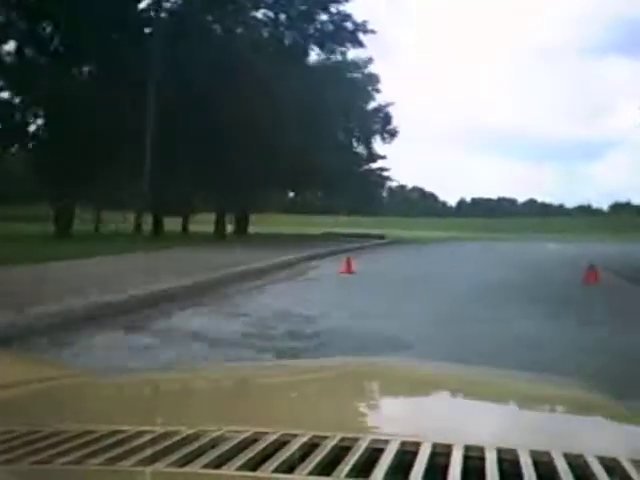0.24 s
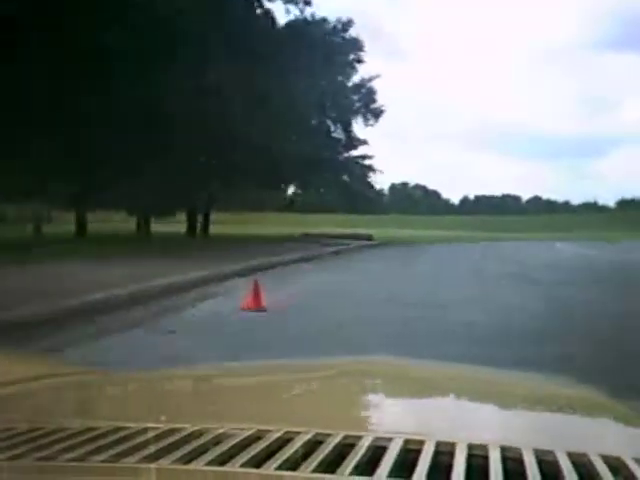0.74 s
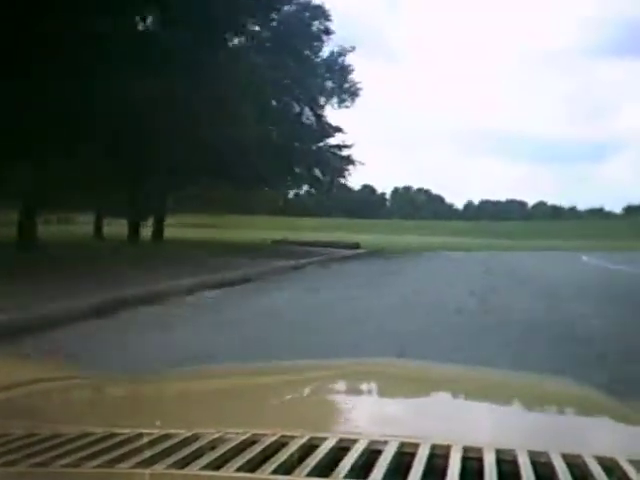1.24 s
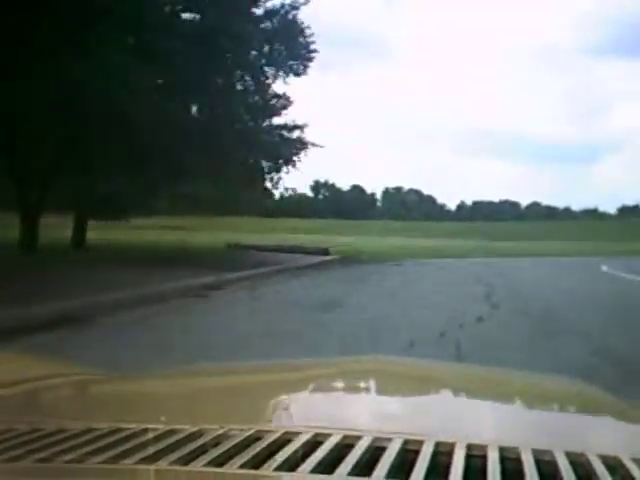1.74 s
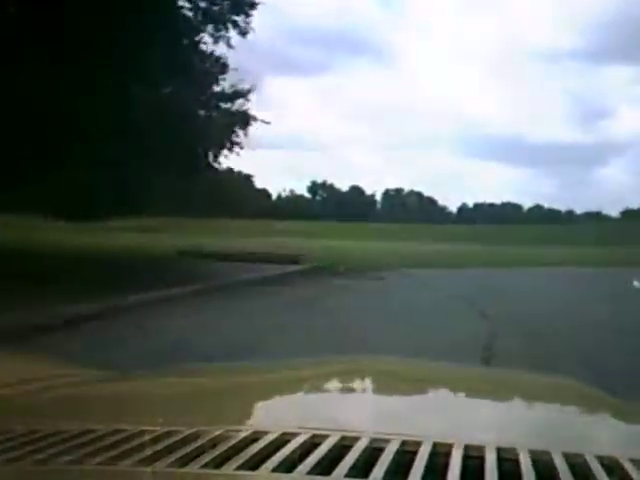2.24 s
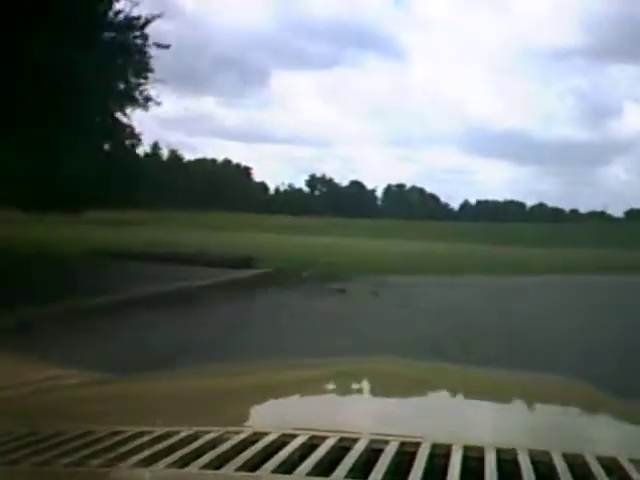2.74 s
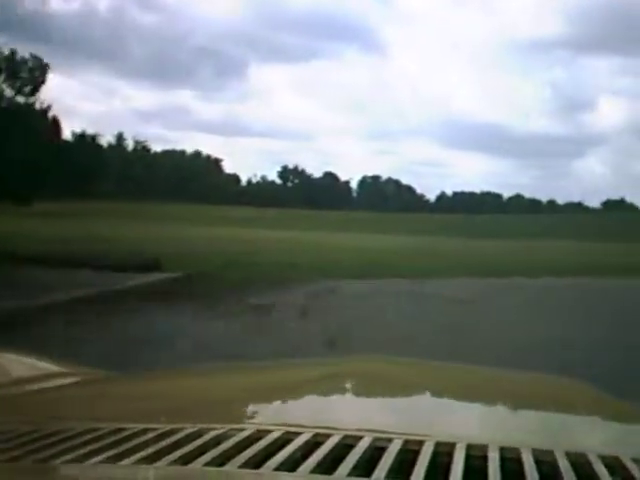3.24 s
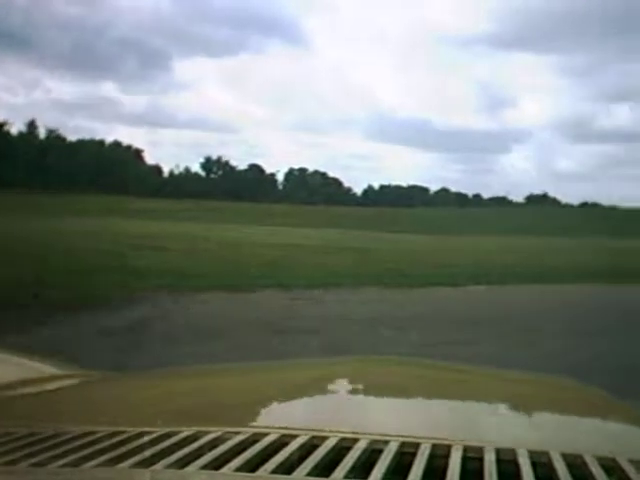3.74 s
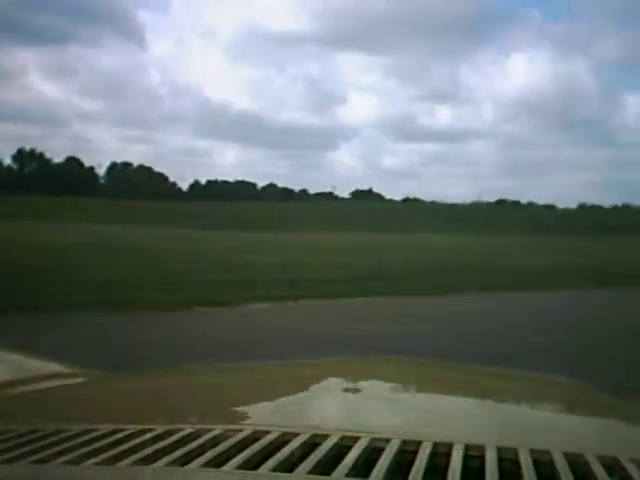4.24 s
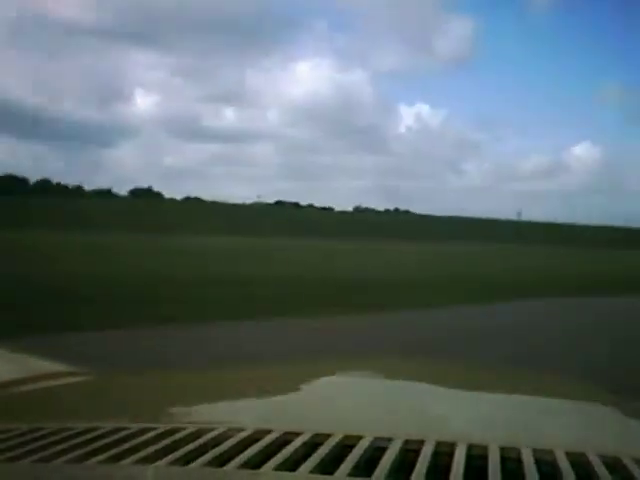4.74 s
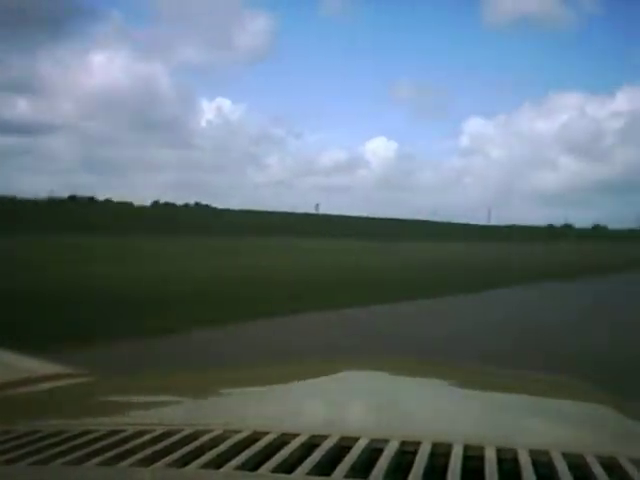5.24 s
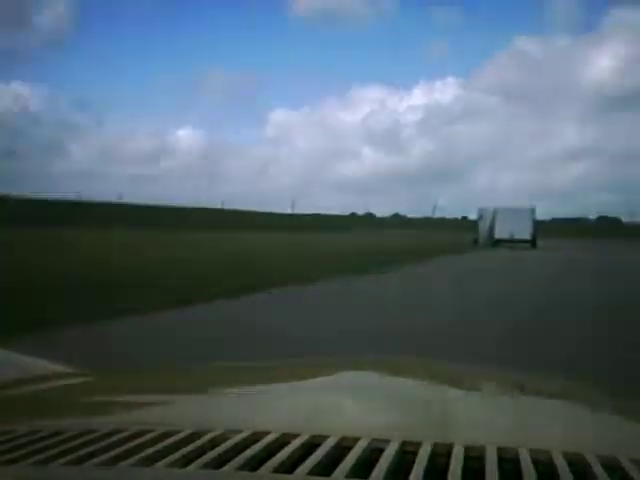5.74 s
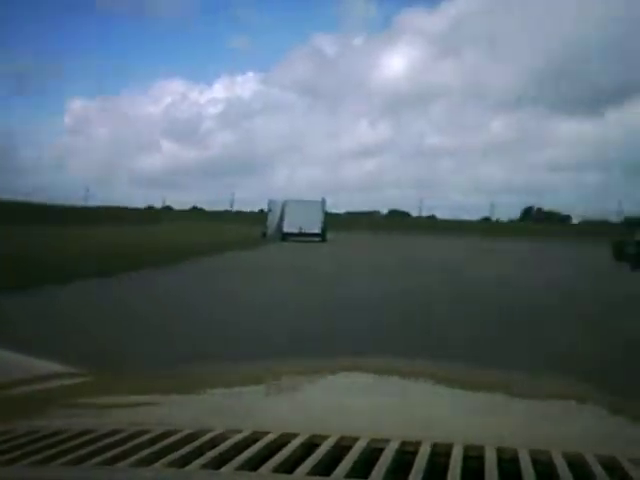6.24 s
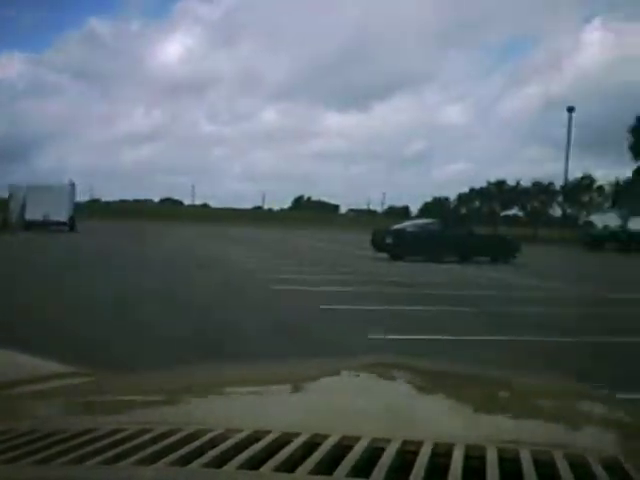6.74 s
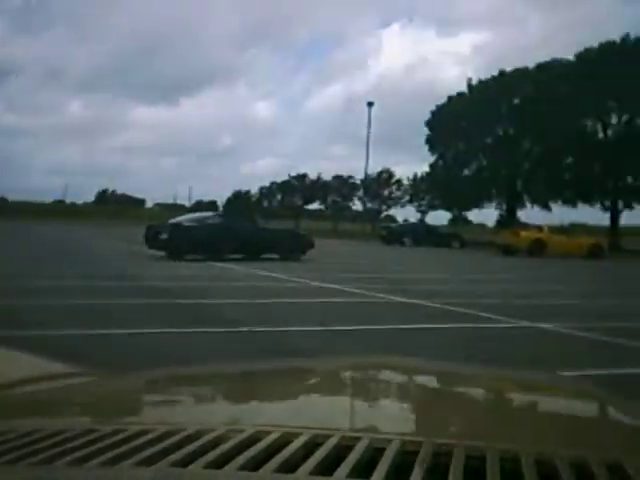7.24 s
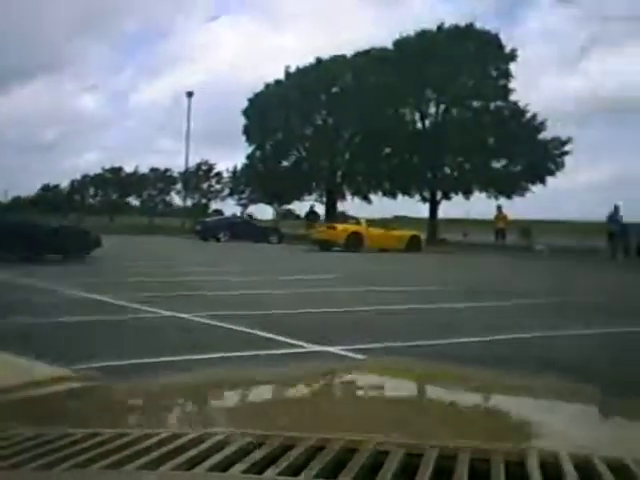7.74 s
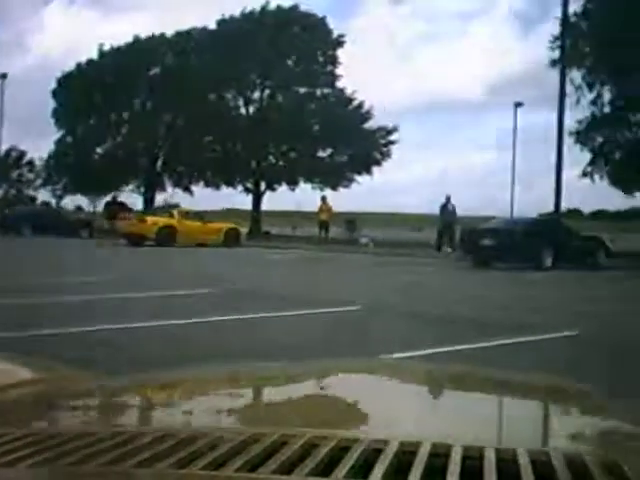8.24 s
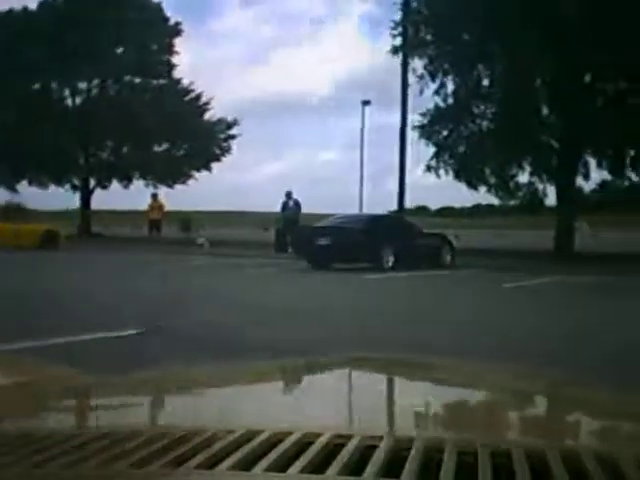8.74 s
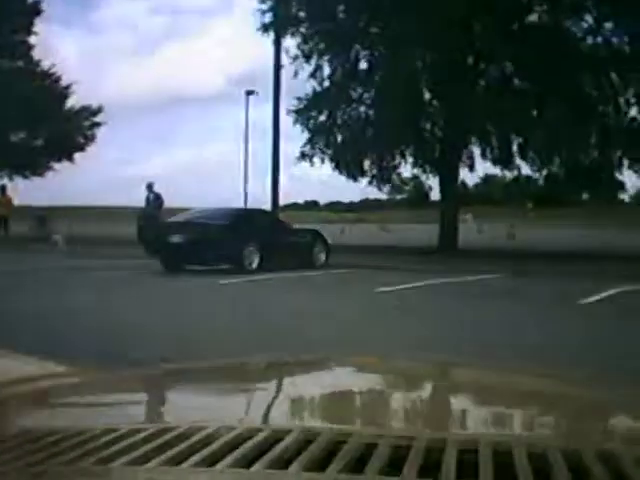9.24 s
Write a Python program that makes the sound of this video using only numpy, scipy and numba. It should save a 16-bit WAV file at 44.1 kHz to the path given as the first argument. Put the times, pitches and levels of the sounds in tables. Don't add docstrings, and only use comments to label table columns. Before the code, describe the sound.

A dashboard camera hears boxy road rumble and hissing tyres as the car slows. A wavering gear whine sinks and disappears, brakes scuff softly, and loose mounting parts rattle over bumps. After a calmer, fading coast, sudden clipped thumps, scraping fingers and dry ticks burst very close to the microphone, with abrupt muted gaps between them until the end.

```python
import sys
import numpy as np
from scipy import signal
from scipy.io import wavfile
from scipy.ndimage import uniform_filter1d
from numba import njit

SR = 44100
rng = np.random.default_rng(int(sys.argv[2]) if len(sys.argv) > 2 else 0)


def volts_from_db(level):
    exponent = np.asarray(level, float) / 20
    return 10 ** exponent


def dump_mix(stems):
    frames = np.atleast_2d(stems).T
    limited = np.clip(frames, -1, 1)
    pcm = np.round(limited * 32767).astype(np.int16)
    wavfile.write(sys.argv[1], SR, pcm)


N = 418499
T = np.arange(N) / SR
RAIL = 0.695

# pitch [Hz], width [Hz], level [dB].
SHELL_HIGH = [(2337, 344, -3.5), (2807, 99, -8.5), (3216, 490, 1), (4040, 710, 1)]


@njit
def svf(x, hz, width):
    y, band, low = np.empty(len(x)), 0., 0.
    g, k = np.tan(np.pi * hz / SR), width / hz
    for i in range(len(x)):
        v = (band + g * (x[i] + 1e-18 - low)) / (1 + g * (g + k))
        band = 2 * v - band
        low = low + 2 * g * v
        y[i] = k * v
    return y


def coupling(x):
    leak_s = 0.00195
    keep = np.exp(-1 / (leak_s * SR))
    return signal.lfilter([1, -1], [1, -keep], x)


def walk(rate):
    k = int(SR / rate)
    steps = np.repeat(rng.standard_normal(N // k + 1), k)
    return 1.4 * uniform_filter1d(uniform_filter1d(steps, k), k)[:N]


def modes(force, table):
    out = np.zeros(N)
    for k, (hz, width, db) in enumerate(table):
        out += (-1) ** k * volts_from_db(db) * svf(force, 1. * hz, 1. * width)
    return out


def murmur(table, flicker_db, rate):
    out = np.zeros(N)
    for hz, width, db in table:
        band = rng.standard_normal(N)
        for _ in range(2):
            band = svf(band, 1. * hz, 1.39 * width)
        out += volts_from_db(db + flicker_db * walk(rate)) * band
    return out / np.std(coupling(out))


def road():
    # time [s], drive [dB].
    drive_points = [(0, 4), (.15, 1.5), (.57, 0), (.82, 0), (.95, 1.5), (1.11, 2), (1.28, -1.5), (1.7, -2),
                    (2.1, -2), (2.78, -3.5), (3.38, -1.5), (3.95, -3.5), (4.55, -4.5), (5.24, -7),
                    (6.0, -7), (6.5, -8), (7.05, -6.5), (9.49, -11)]
    # pitch [Hz], width [Hz], level [dB].
    cabin_modes = [(32.3, 8.6, 4), (57.2, 14, 1), (87.55, 12.6, 3), (138.5, 37.7, -8), (186.5, 32.7, -10),
                   (263, 26, -20.5)]
    # pitch [Hz], width [Hz], level [dB].
    shell_low = [(538.4, 130, -6.5), (786.4, 127, -0.5), (1070, 230, -6), (1281, 101, -5), (1600, 340, -17)]
    drive_db = np.interp(T, *np.transpose(drive_points))
    grain_db = 0.69 * walk(30) + 0.81 * walk(120)
    rumble_db = -19 + 0.59 * drive_db
    roar_db = -34 + drive_db + grain_db
    hiss_db = -35 + 0.86 * drive_db + grain_db
    rumble = volts_from_db(rumble_db) * murmur(cabin_modes, flicker_db=1.5, rate=9.8)
    roar = volts_from_db(roar_db) * murmur(shell_low, flicker_db=-2.17, rate=20)
    hiss = volts_from_db(hiss_db) * murmur(SHELL_HIGH, flicker_db=1.42, rate=25)
    return rumble + roar + hiss


def gears():
    # time [s], pitch [Hz], level [dB].
    whine_points = [(0, 3360, -46), (.5, 3320, -44), (.85, 3180, -42), (1.15, 2990, -47), (1.4, 2850, -45),
                    (1.65, 2710, -58), (2.4, 2360, -57), (2.62, 2180, -49), (2.95, 1950, -75)]
    s, hz, db = np.transpose(whine_points)
    pitch = np.interp(T, s, hz) * (1 + 0.003 * walk(60) + 0.004 * walk(12))
    swell_db = np.interp(T, s, db, right=-120) + 1 + 3.5 * walk(22)
    return np.sqrt(2) * volts_from_db(swell_db) * np.sin(2 * np.pi * np.cumsum(pitch) / SR)


def brakes():
    start_s, attack_s, hold_s, release_s = 1.614, 0.16, 0.35, 0.45
    level_db, range_db = -26.5, 33.5
    s = start_s + np.cumsum([0, attack_s, hold_s, release_s])
    grip_db = level_db - range_db * np.array([1, 0, 0, 1])
    grip_db = np.interp(T, s, grip_db, left=-120, right=-120)
    # pitch [Hz], width [Hz], level [dB]
    disc_modes = [(1730, 80, -16), (2570, 130, -9.0), (3052, 90, -4.5), (3246, 99, 0),
                  (3520, 57, -2), (3720, 260, -2.5), (3670, 180, -1), (4200, 190, 3.5)]
    return volts_from_db(grip_db) * murmur(disc_modes, flicker_db=-3.5, rate=18)


def thumps():
    # start [s], size [dB], settled pitch [Hz], time to fade by 60 dB [s].
    bumps = [(-.008, 1.5, 51.97, 0.63), (-.004, -2, 78.97, 0.74), (.064, 0.5, 100, 0.097),
             (0.808, -5, 95, .15), (.82, -15.5, 190, .08), (0.889, -5, 70, .15), (.93, -13.5, 140, 0.15),
             (1.015, -10, 110, 0.14), (1.185, -10, 120, 0.081), (1.097, -4.5, 85, 0.23),
             (1.099, -13, 170, .1), (2.342, -14.5, 620, .02), (2.354, -20, 357, 0.019),
             (4.0682, -2.5, 2220, 0.00083)]
    # start [s], size [dB], settled pitch [Hz], time to fade by 60 dB [s].
    hand_blows = [(7.101, 6, 86, .29), (7.108, -7.5, 620, 0.037), (7.412, -1.5, 50.8, .25),
                  (7.6, -4, 128, 0.042), (7.874, 2.5, 75, 0.062), (7.603, -8, 300, 0.0088),
                  (7.851, -11, 200, 0.024), (7.886, -0.5, 330, 0.016), (7.722, 0.5, 174, 0.01),
                  (8.039, 0, 209.7, 0.13), (8.043, -2.5, 504, 0.064), (8.047, 0.5, 110.6, 0.16),
                  (8.631, -1, 147, 0.015), (8.265, -7, 220, 0.006), (8.309, 5, 158, 0.0083),
                  (8.379, -11.5, 193, 0.058), (9.11, -11, 872, 0.066), (9.311, 3.5, 310, 0.0021)]
    stiffening, settle_s = 0.3, 0.017
    out, wobble = np.zeros(N), 0.32 * walk(70)
    for s, db, hz, t60 in list(bumps) + list(hand_blows):
        near = slice(max(int(s * SR), 0), int((s + t60) * SR))
        t = T[near] - s
        turns = hz * (t + stiffening * settle_s * (1 - np.exp(-t / settle_s)))
        swing = np.sin(2 * np.pi * turns + wobble[near] * turns)
        out[near] += volts_from_db(db - 60 * t / t60) * swing
    return out


def touch(events, slip_db, blow_db, t60):
    out = np.zeros((2, N))
    slip = rng.standard_normal(N) * volts_from_db(slip_db * walk(400))
    for s, db, treble_db, contact_s in events:
        i = int(s * SR)
        t = T[:min(int((contact_s + t60) * SR), N - i)]
        fade_db = 60 * np.maximum(t - contact_s, 0) / t60
        force = slip[i:i + len(t)] * volts_from_db(db - fade_db)
        force[:4] += volts_from_db(db + blow_db)
        out[:, i:i + len(t)] += force * volts_from_db(np.array([[0], [treble_db]]))
    return out


def rattles():
    # start [s], peak [dB], treble share [dB].
    rattle_events = [(.054, -14.5, -19), (.222, -22.5, -3), (.337, -32, -17), (.72, -33, 9.5),
                     (.79, -12.5, -5.5), (.984, -23, -1.5), (2.097, -32, 8), (2.335, -13, 1),
                     (2.718, -21.5, -32), (2.968, -26, -2.5), (3.222, -18, -19), (3.62, -33, -8.5),
                     (3.935, -19, -18), (4.482, -22, -21.5), (5.269, -27.5, -1.5), (6.153, -31, -36),
                     (6.606, -20, -11.5)]
    contact_s = 0.012
    events = [(*row, contact_s) for row in rattle_events]
    return touch(events, slip_db=1.0, blow_db=8.0, t60=0.04)


def rubs():
    # start [s], peak [dB], treble share [dB], contact [s].
    rub_events = [(.0145, -3, -32, 0.0059), (7.104, -7.5, -8, 0.011), (7.14, -16, 0.5, 0.017),
                  (7.314, -5.5, -5.5, .016), (7.345, 8, -16.5, 0.016), (7.372, 4, -21.5, 0.0086),
                  (7.385, 8, -21, 0.039), (7.432, -11, -35, .013), (7.45, -1, -29, 0.019),
                  (7.485, -12, -16, 0.03), (7.563, -2.5, -29, 0.025), (7.600, -3, -13.5, 0.046),
                  (7.722, -1.5, -11, 0.0089), (7.735, -4.5, -13.5, 0.013), (7.842, -15.5, -14, 0.013),
                  (7.863, -10, -8, 0.023), (7.886, -1, -14, 0.035), (8.039, -1, -15.5, 0.032),
                  (8.376, -21.5, -9, 0.014), (8.415, -12.5, -34, 0.0083), (8.469, -16, -5.5, .014)]
    return touch(rub_events, slip_db=1.2, blow_db=4, t60=0.056)


def taps():
    # start [s], peak [dB], treble share [dB].
    tap_events = [(7.101, 9.5, -14.5), (7.524, 2.5, -19.5), (7.581, -18, -14.5), (7.598, -3, -15.5),
                  (7.701, -10, -24), (7.777, -11.5, -41), (7.809, -16, -18), (7.83, -4, -14),
                  (7.872, 0.5, -15), (7.944, -12, -19), (8.15, -6.5, -30), (8.264, -25.5, -26),
                  (8.283, -27.5, -39.5), (8.306, -21, -29), (8.632, -15, -17), (8.642, -12, -31),
                  (8.878, -21, -27), (8.997, -20, -15), (9.084, -36, -19), (9.1085, -3.5, -11.5),
                  (9.162, -27, 0.5), (9.236, -38, 10), (9.27, -29, -26), (9.287, -42, 8)]
    contact_s = 0.0023
    events = [(*row, contact_s) for row in tap_events]
    return touch(events, slip_db=5.5, blow_db=14.5, t60=0.048)


def shell(forces):
    # pitch [Hz], width [Hz], level [dB].
    rubbed_modes = [(839, 138, -6.5), (1015, 77, -6.5), (1236, 114, 0), (1420, 330, -9), (1970, 310, -17)]
    dull, bright = forces
    body = svf(dull, 1100.0, 1500.)
    ring = volts_from_db(6.0) * modes(body, rubbed_modes)
    bent = np.interp(T + 0.0005 * walk(30), T, ring)
    crack = volts_from_db(-18.5) * svf(bright, 3900.0, 3500.)
    return bent + crack + volts_from_db(2.5) * modes(bright, SHELL_HIGH)


def ticks():
    # start [s], peak [dB], treble share [dB].
    tick_events = [
        (8.6858, 10.5, -1),
        (8.788, -12.5, -2.5),
        (9.109, 0, 2.5),
    ]
    contact_s, ring_db = 0.001, -8.5
    events = [(*row, contact_s) for row in tick_events]
    forces = touch(events, slip_db=-4.0, blow_db=11, t60=0.0033)
    return shell(volts_from_db(ring_db) * forces) + svf(forces[1], 2400., 9000.0)


def shoves():
    # arrives [s], leaves [s], side [+1 or -1],
    # pressure halfway there [shares of the limit].
    pins = [(7.9300, 7.9402, -1, -.5), (7.9485, 7.9535, -1, -.8), (7.9905, 7.9946, 1, .6),
            (7.9979, 8.0183, 1, .85), (8.0836, 8.1028, -1, 0), (8.1078, 8.1165, -1, -.4),
            (8.1660, 8.1861, 1, .3), (8.2239, 8.2293, 1, .45), (8.2346, 8.2461, 1, .7),
            (8.3294, 8.3592, -1, -.7), (8.4349, 8.4688, -1, -.35), (8.4817, 8.5433, 1, -.1),
            (8.5441, 8.5937, -1, 0), (8.5945, 8.6036, 1, 0), (8.6046, 8.6318, 1, .65),
            (8.6743, 8.6783, -1, -.6), (8.6895, 8.7026, -1, -.7), (8.7034, 8.7332, 1, 0),
            (8.7384, 8.7755, 1, .3), (8.8871, 8.8951, -1, .2), (8.8996, 8.9020, -1, -.85),
            (8.9790, 8.9872, -1, .1), (8.9895, 8.9963, -1, -.8)]
    # time [s], pressure [shares of the limit].
    sways = [(7.905, 0), (8.036, 0), (8.127, .1), (8.1355, -.8), (8.265, .5), (8.308, -.6), (8.378, -.5),
             (8.392, .7), (8.429, .3), (8.636, -.1), (8.650, -.6), (8.660, -.2), (8.795, -.5), (8.851, .6),
             (8.912, 0), (9.010, -.4), (9.039, .9), (9.055, 0)]
    overpress, overpress_s = 1.8, 0.002
    points = [tuple(row) for row in sways]
    for arrive, leave, side, slack in pins:
        before = max(s for s, _ in points if s < arrive)
        edge = min(overpress_s, (leave - arrive) / 3)
        points += [((before + arrive) / 2, slack), (arrive, side)]
        points += [(arrive + edge, overpress * side), (leave - edge, overpress * side), (leave, side)]
    pressure = np.interp(T, *np.transpose(sorted(points)))
    return RAIL * uniform_filter1d(pressure, size=19)


def scene():
    car = road() + gears() + brakes() + thumps()
    handled = shell(rattles() + rubs() + taps()) + ticks()
    return (car + handled + shoves())[None]


def top_cut(x):
    return signal.sosfilt(signal.butter(12, 15870, fs=SR, output="sos"), x)


def record(dry):
    top_hz, ceiling = 4052, 0.707
    x = coupling(np.clip(dry, -RAIL, RAIL))
    low_pass = signal.cheby2(10, 90, top_hz * 1.352, fs=SR, output="sos")
    x = signal.sosfilt(low_pass, x)
    x = np.clip(x, -ceiling, ceiling)
    return top_cut(x)


dry = scene()
out = record(dry)
dump_mix(out)
```